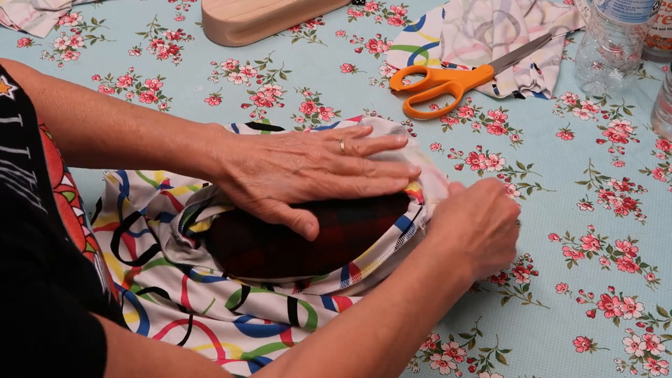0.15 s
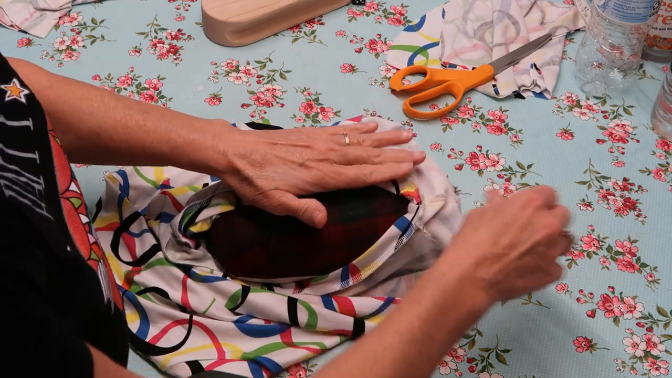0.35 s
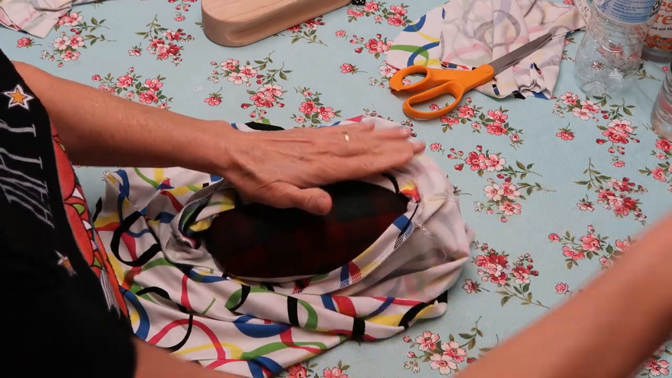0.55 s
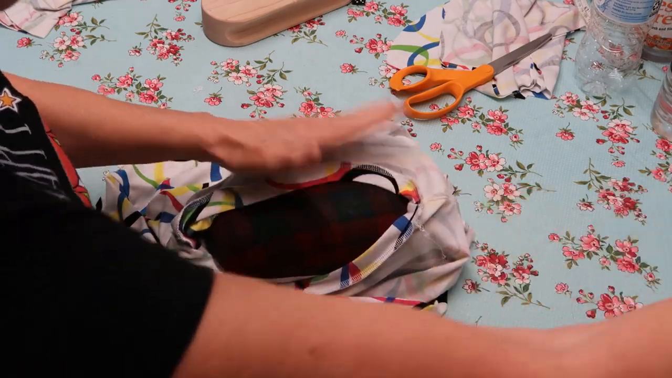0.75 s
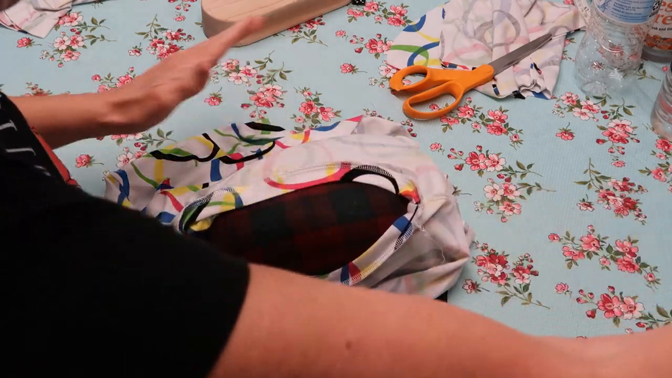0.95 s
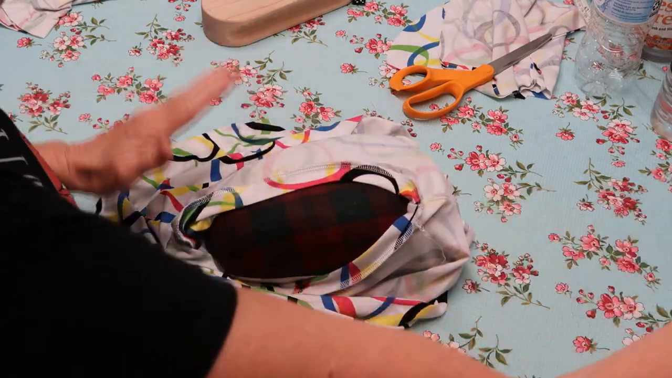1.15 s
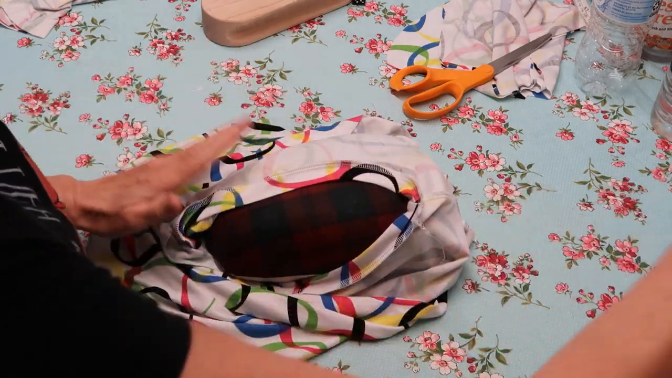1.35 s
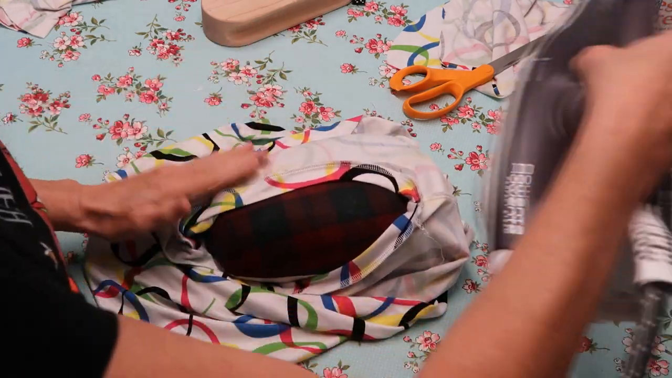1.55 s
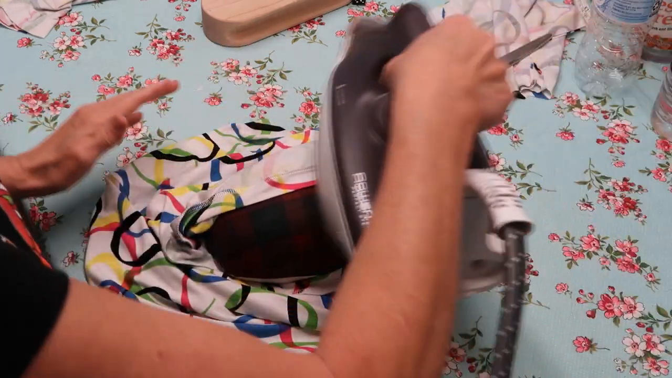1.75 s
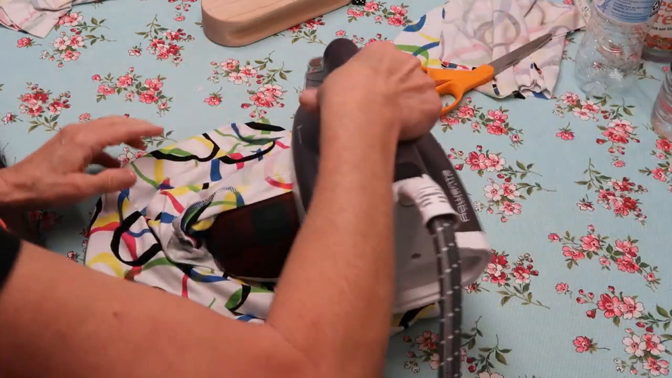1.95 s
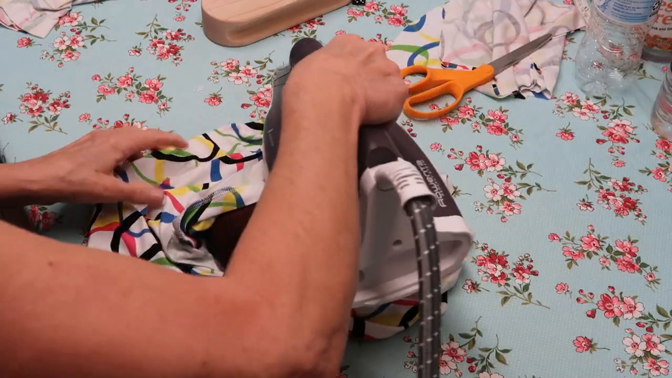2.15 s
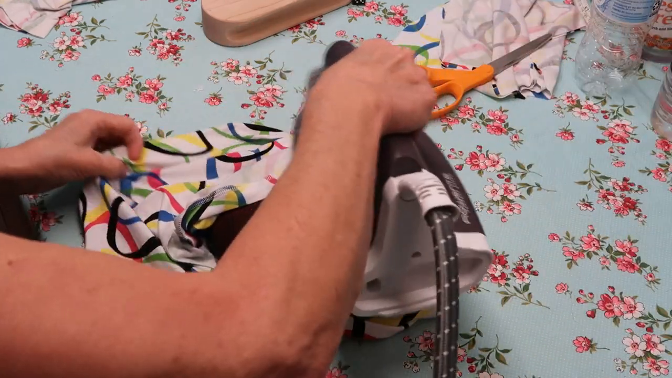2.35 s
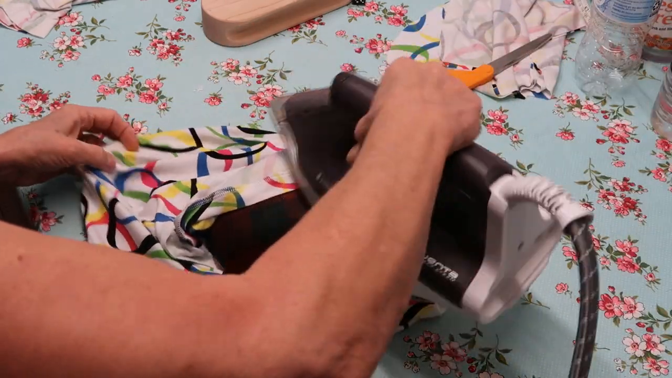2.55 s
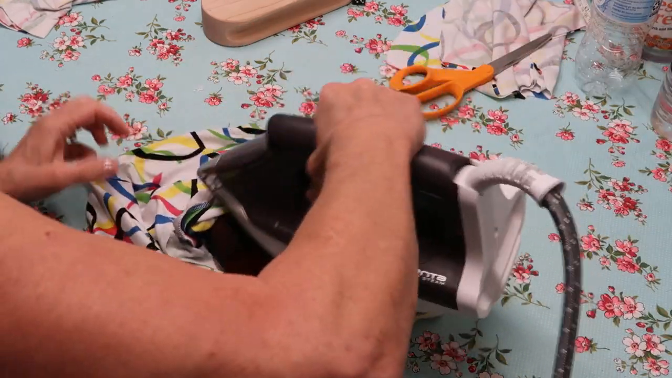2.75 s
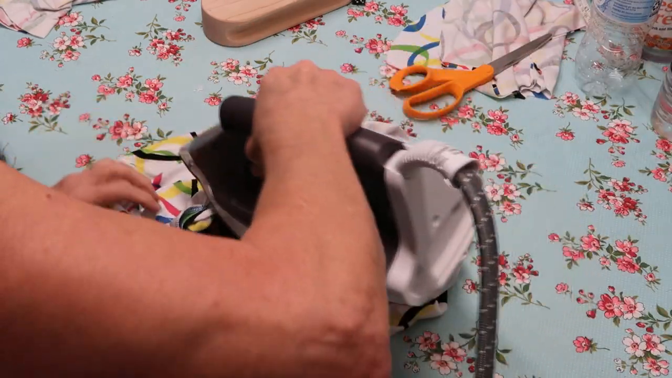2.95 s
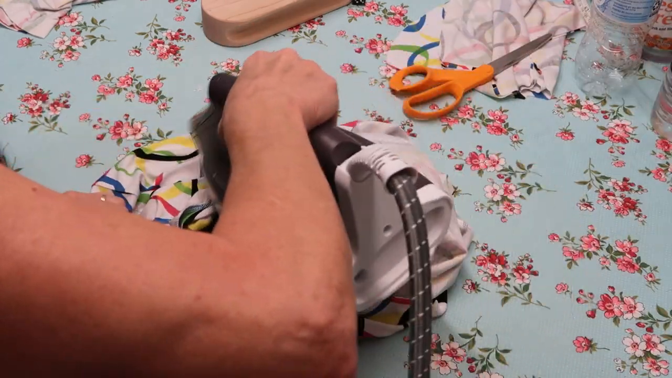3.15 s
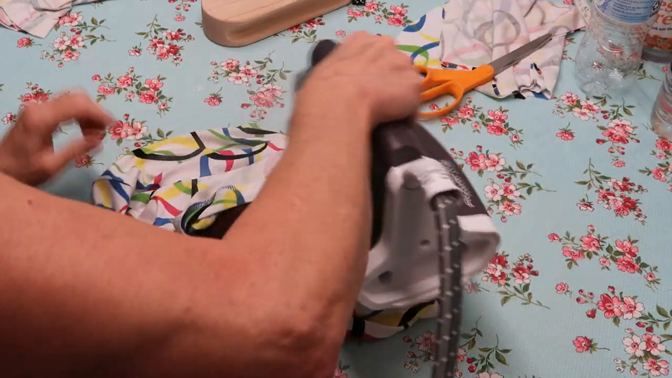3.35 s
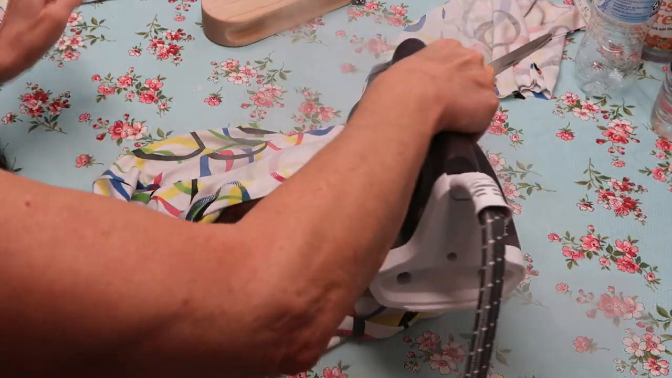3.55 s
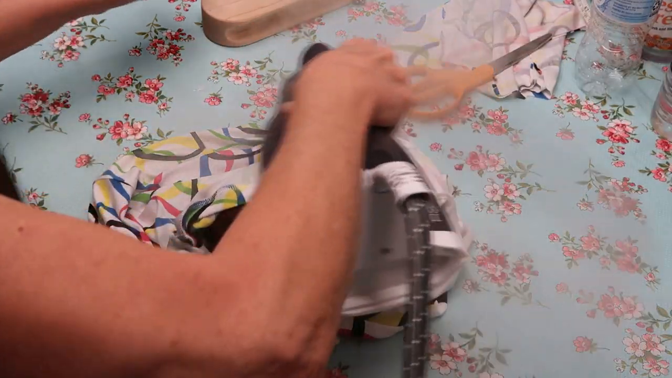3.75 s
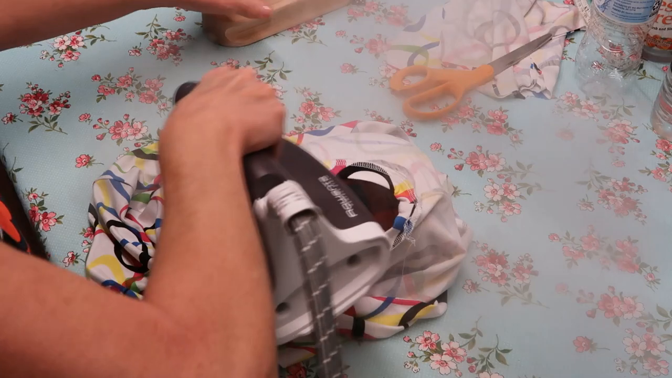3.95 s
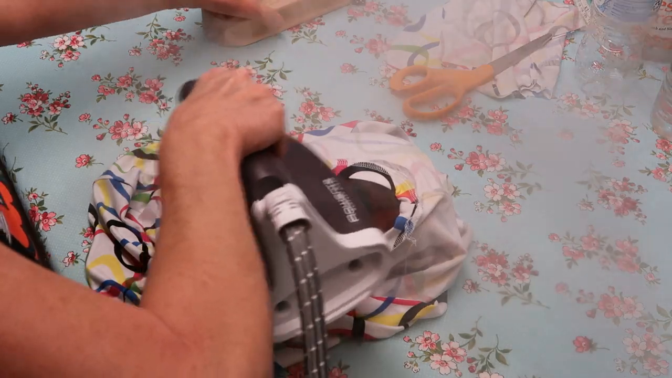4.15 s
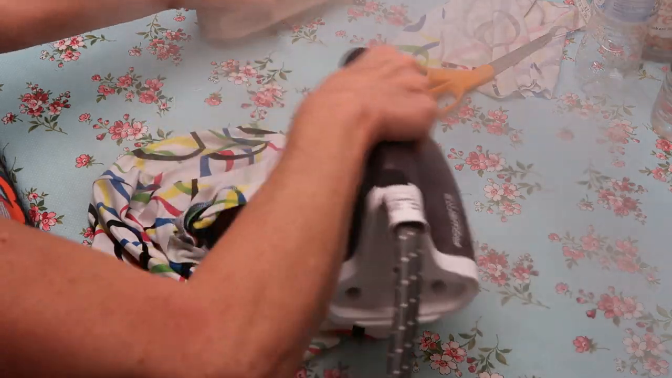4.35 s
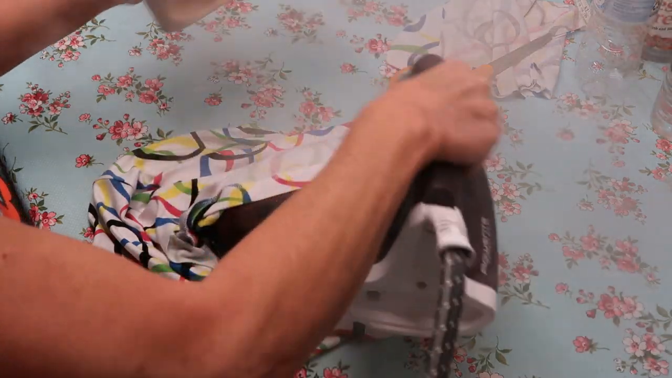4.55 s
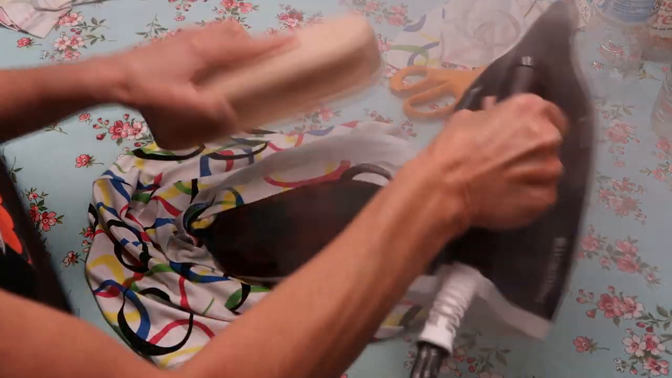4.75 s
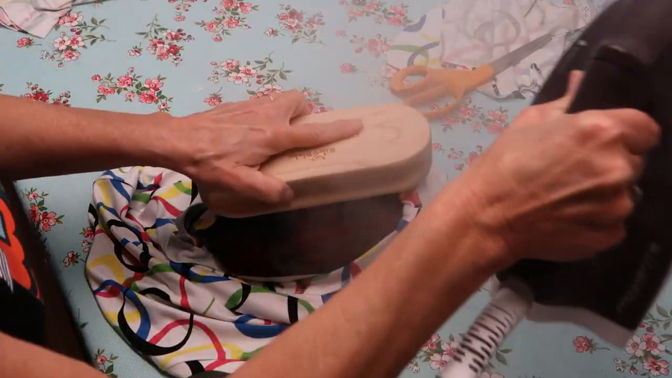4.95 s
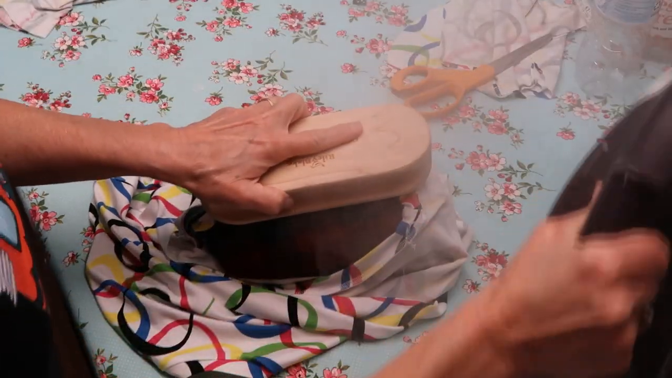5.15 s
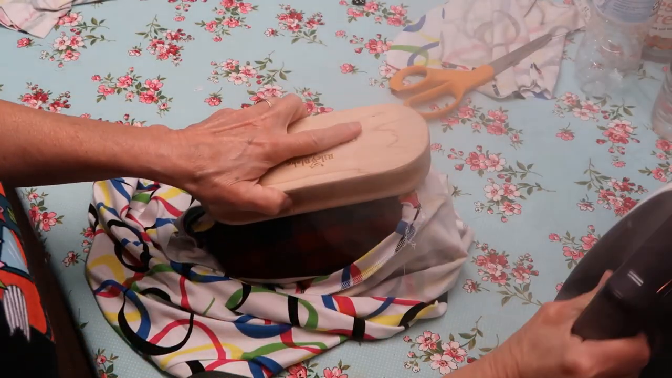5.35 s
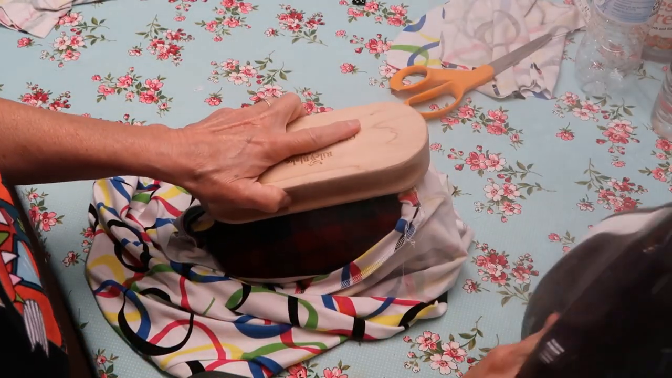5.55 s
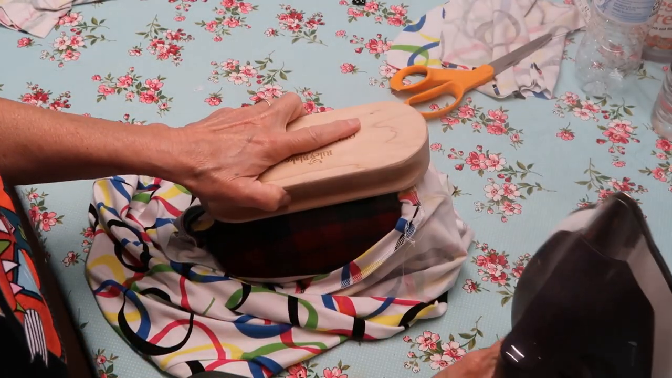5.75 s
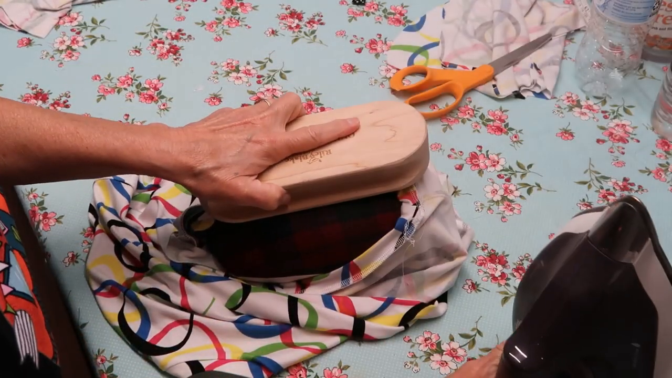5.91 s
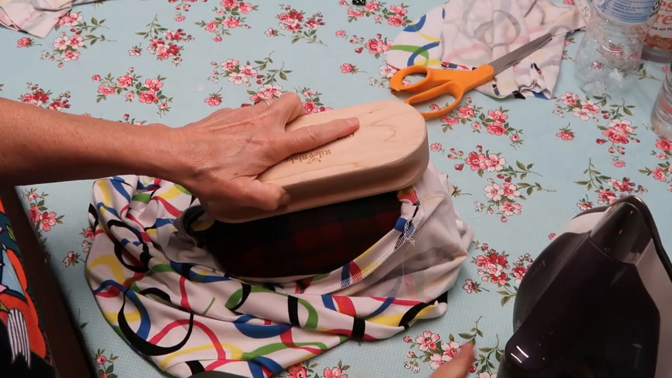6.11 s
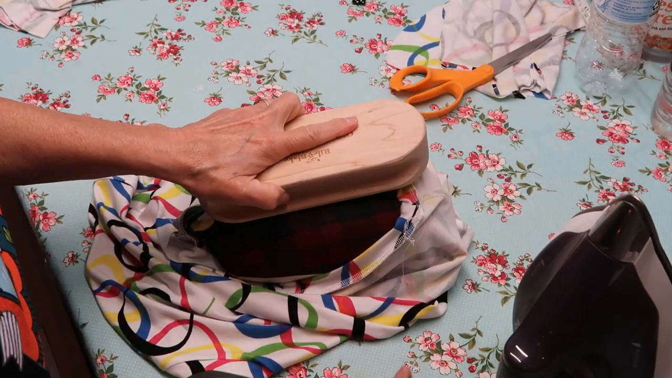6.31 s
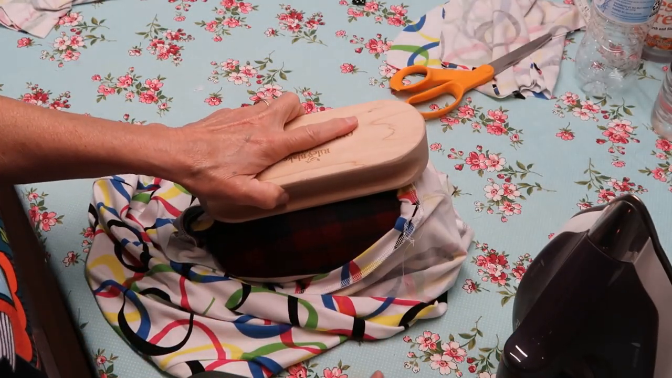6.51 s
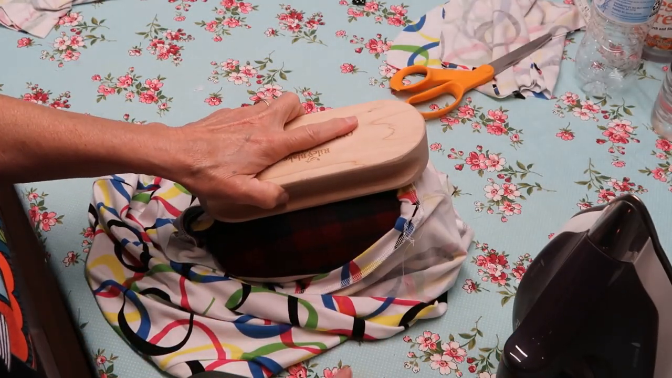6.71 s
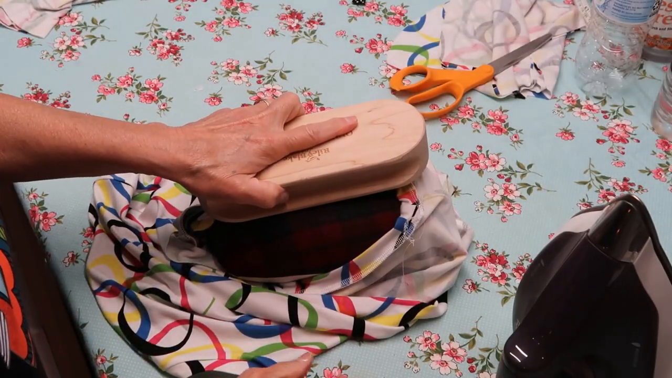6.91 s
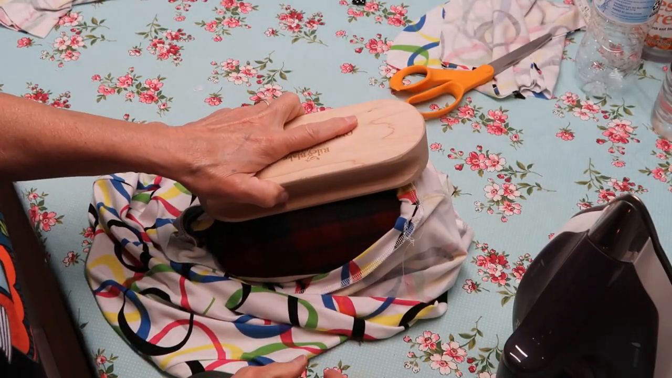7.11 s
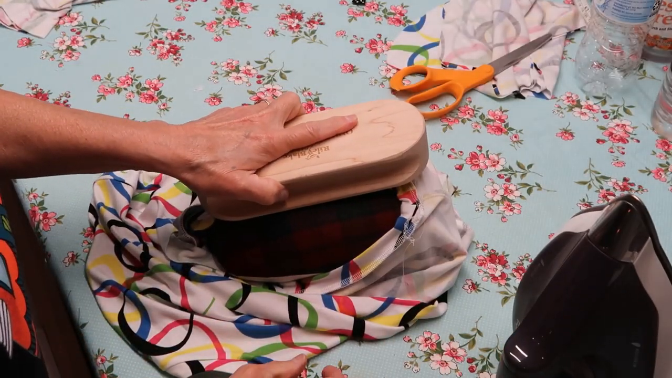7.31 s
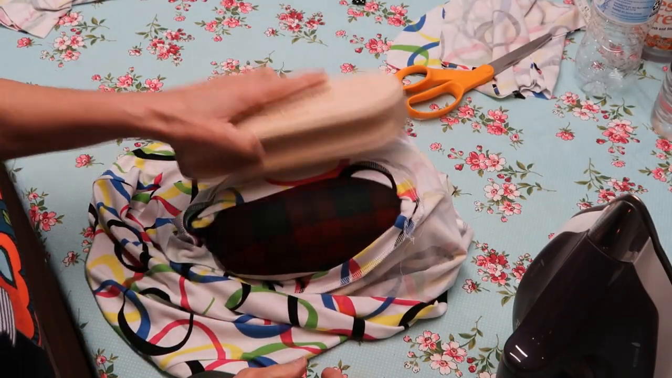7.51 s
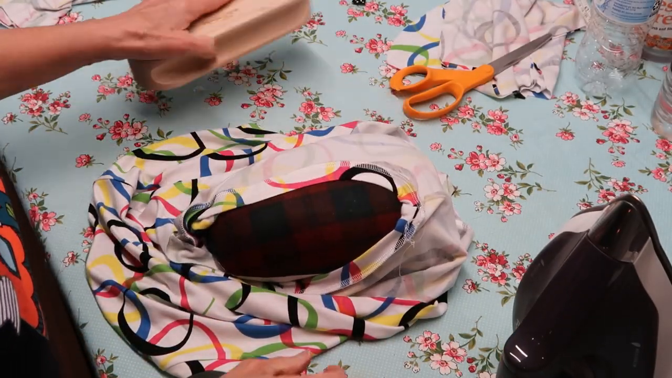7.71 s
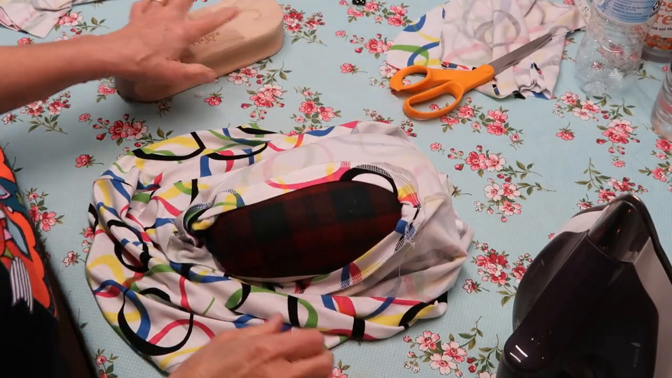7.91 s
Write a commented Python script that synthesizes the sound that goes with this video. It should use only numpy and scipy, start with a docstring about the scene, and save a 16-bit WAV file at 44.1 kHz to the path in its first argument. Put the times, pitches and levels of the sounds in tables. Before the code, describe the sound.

A quiet room is heard close up, with a faint low tremble from a padded table. For the first two seconds, hands make soft pats, light knocks and faint cloth rubs. At about 2.2 seconds a steam iron lands with a dull knock and small clicks, then rubs briefly over fabric. At 3 seconds its trigger clicks sharply and a loud burst of steam hisses until about 3.7. Another click at 3.9 starts a second, slightly duller burst, dying away by 4.7. Water then sizzles inside the iron with a slight whistle, strongest around 5.2 and faint until 7.5. A wooden block presses onto the cloth with soft thumps around 5 seconds, and the iron is set down with a low thump and small clicks near 5.6. At about 7.9 the block is put down with a dull knock.

```python
"""Soft thumps, knocks and rubs come first: hands, a steam iron and a wooden block on cloth over a padded table.
The trigger clicks and the iron blows two bursts of steam, turbulent noise coloured by the vents of its
sole plate; then water sizzles on in the resonant chamber. Blows excite damped modes of iron and table,
sliding friction hisses, and the padding groans when pushed. Behind it all lie a low tremble of the
table, a quiet room and the thin whine of camera electronics."""
import sys
import numpy as np
from scipy import signal
from scipy.io import wavfile
from scipy.ndimage import uniform_filter1d

SR = 44100
rng = np.random.default_rng(int(sys.argv[2]) if len(sys.argv) > 2 else 0)


def pcm_store(signal):
    """Save signal as 16-bit PCM."""
    levels = np.round(np.clip(np.atleast_2d(signal), -1, 1) * 32767)
    wavfile.write(sys.argv[1], SR, levels.astype(np.int16).T)


N = 355887

# soft blows on the table: t/s, peak level/dB, most excited f/Hz, rise/s
TABLE_BLOWS = [(0.254, -38, 53.4, 0.0048), (0.437, -31.5, 50, 0.0067), (0.666, -41, 61.9, 0.0092),
               (0.942, -41, 56.5, 0.015), (1.073, -35, 53.8, 0.02), (1.309, -28, 57, 0.0062),
               (1.543, -27, 100, 0.0035), (1.913, -31.5, 71.5, 0.0065), (2.139, -30, 97, 0.0052),
               (3.154, -23, 147, 0.0026), (4.921, -23, 92, 0.0076), (4.944, -22.5, 87.4, 0.011),
               (5.142, -28.5, 162, 0.0052), (5.427, -31.5, 94, 0.0037), (5.57, -18.5, 105, 0.0064),
               (7.742, -44, 55, 0.015), (7.852, -18, 99, 0.004), (7.929, -38, 114.2, 0.018)]


def steam_jets(mix):
    """Turbulence drives the vent resonances; pressure brightens the jet, cloth over the vents dulls it."""
    # valve openings: t/s, ramp/s, first level/dB, settling/s, steady level/dB, shutting t/s,
    # decay/(dB/s), end t/s, then at full pressure: treble/dB, roar/dB, f/Hz of the hollow under the plate
    bursts = [(3.016, 0.017, -17.5, 0.046, -27, 3.23, 197.5, 3.24, 0, -6.5, 2630),
              (3.162, 0.042, -8, .07, -13, 3.686, 93.5, 6, 3, -17.5, 2820),
              (3.908, 0.017, -17, 0.18, -10.5, 4.39, 115, 4.75, -8, -17.5, 2630)]
    # spectrum of the jet: f/Hz, density level/dB
    jet_spectrum = [(71, -50.5), (120, -26.5), (156, -26), (203, -23.5), (356, -8), (590, -2.5),
                    (693, -7.5), (1590, -6.5), (1720, -1.5), (1900, -11), (3080, -3), (3700, -7),
                    (6000, -4.5), (12900, -18.5), (14900, -43)]
    # steam channels of the sole plate: f/Hz, width/Hz, level/dB
    vents = [(1434, 17.098, 3), (1762, 28, -5), (1920, 59, -0.5), (2083, 43, 1.5), (2210, 43, -4),
             (2470, 19, 1), (2700, 38, -6.5), (3060, 42, -7), (3517, 73, -1), (3915, 60, 0),
             (4330, 21, 3.5), (4620, 27, -0.5), (4990, 23, -1), (6050, 76, -13.5), (7200, 80, -4)]
    ramp_db, knee_s, full_pressure_db = 23, 0.036, -12.5

    def colour(hz, treble_db, roar_db, hollow_hz):
        tilt_db = (treble_db + 8.5) * shelf(hz, 7600) + (roar_db + 13) * (1 - shelf(hz, 1300))
        hollow = resonances([(hollow_hz, 900, 6)], hz, valley_db=-0.24)
        return amp(curve(jet_spectrum, hz) + tilt_db) * resonances(vents, hz, valley_db=-8.5) * hollow
    for start, ramp, first_db, settle, steady_db, shut, decay, end, treble, roar, hollow_hz in bursts:
        t = np.arange(0, end - start, .004)
        open_s = np.maximum(t - ramp, 0)
        db = steady_db + (first_db - steady_db) * np.exp(-open_s / settle)
        db -= ramp_db * np.maximum(1 - t / ramp, 0)  # the valve opens
        db -= decay * knee_s * np.logaddexp(0, (t + start - shut) / knee_s)  # and shuts softly
        slack_db = np.maximum(full_pressure_db - db, 0)
        wet_db = 16.5 * np.exp(-open_s / .03)  # wet steam comes first, the treble follows
        controls = [treble - 2 * slack_db - wet_db, roar + 0.26 * slack_db, hollow_hz - 9 * slack_db]
        add(mix, start, close_noise(start + t, db, colour, controls, (1500, 6000), 2.5, 0.5))


def sizzle(mix):
    """Boiling excites the chamber's cavity resonances; harder boiling is brighter and whistles more."""
    # water boiling off inside the iron: t/s, level/dB, whistle f/Hz
    boiling = [(4.55, -52, 2300), (4.65, -45, 2320), (4.89, -37, 2405), (5.2, -34.5, 2240),
               (5.36, -40, 2040), (5.56, -46.5, 2030), (5.78, -57, 2100), (5.86, -50, 2210),
               (6.07, -57, 2140), (6.799, -56, 2200), (7.4, -57, 2190), (7.55, -74, 2170)]
    # chamber resonances: f/Hz, width/Hz, level/dB
    chamber = [(1091, 130, 6), (1450, 49, 0), (1690, 50, 6.5), (1920, 64, 2), (2703, 66, 4), (3010, 78, -1),
               (3620, 290, -5.5)]

    def colour(hz, centre_hz, whistle_hz, whistle_db):
        cavity = resonances(chamber + [(whistle_hz, 90, whistle_db)], hz, valley_db=-24.5)
        return cavity * amp(-1.8 * np.log2((hz + 1) / centre_hz) ** 2)
    times, db, whistle_hz = np.transpose(boiling)
    vigour_db = db + 35  # relative to a hard boil
    controls = [1850 + 33 * vigour_db, whistle_hz, 10 + 0.2 * vigour_db]
    add(mix, times[0], close_noise(times, db, colour, controls, (900, 4500), 3.5, 0.5))


def clicks(mix):
    """Impulse excitation: the iron's shell rings in its modes under a short crack of noise."""
    # trigger, valve and cord: t/s, level/dB, T60/s, relative crack/dB, most excited f/Hz
    snaps = [(2.0128, -41, 0.045, -19, 3110), (2.0482, -30.5, 0.072, -9.5, 2640),
             (2.1454, -18.5, 0.13, -17, 3570), (2.293, -24, 0.092, -11.5, 1490),
             (2.9146, -34.5, 0.06, -6.5, 2570), (3.0106, -4.5, 0.046, -19.5, 1290),
             (3.0135, -13, 0.07, -12, 4300), (3.9143, -15, 0.058, -16.5, 2460),
             (4.852, -33, 0.05, -16, 2520), (5.3449, -31, 0.087, -19, 1650),
             (5.7954, -29, 0.097, -4.5, 1540), (6.8508, -54, 0.041, -27, 3500),
             (7.4993, -43.5, 0.055, -7.5, 1740), (8.0531, -48.5, 0.066, -29, 1450)]
    # modes of the shell: f/Hz, level/dB, T60/s
    shell = [(850, -2.5, .04), (967, -4, 0.0521), (1420, -2, .24), (1980, -7, 0.059), (2617, -0.5, 0.3),
             (3194, -1, 0.03), (3580, 0, 0.046), (4380, 1.5, 0.081), (4930, -4.5, .04), (5750, -1, 0.04)]
    t = np.arange(round(.25 * SR)) / SR
    for start, db, t60, crack_db, centre_hz in snaps:
        white = rng.standard_normal((2, len(t)))
        hiss = bandpass(white[0] + 3.4 * white, (2500, 10000), order=2)
        crack = unit_rms(hiss) * amp(crack_db - 8 - 60 * t / (1.2 * t60))
        click = (struck_modes(shell, centre_hz, t, t60) + crack) * np.minimum(t / 0.00032, 1)
        add(mix, start, amp(db) * in_room(click))


def knocks(mix):
    """Two damped clusters of close modes beat into a dull knock under a dry crack."""
    # fingers, block and iron: t/s, level/dB, low f/Hz, high f/Hz, high share/dB, T60/s, relative crack/dB
    impacts = [(0.303, -26, 403, 1776, -4.5, 0.096, -24), (0.929, -43, 502, 1280, -1, 0.15, -27),
               (1.072, -18.5, 696, 1198, 4, 0.052, -17.5), (1.084, -31, 316, 1178, -14, 0.12, -32),
               (1.298, -28.5, 375, 802, -22, 0.032, -37), (1.531, -22.5, 377, 832, -13, 0.08, -26.5),
               (1.945, -33, 460, 824, -3, 0.073, -19), (2.152, -8.5, 494, 1750, -8.5, 0.031, -17.5),
               (2.219, -18, 374, 1440, -16, 0.028, -25), (2.367, -27, 366, 1290, -14, 0.059, -28),
               (3.011, -7, 363, 1446, -1.5, 0.046, -13.5), (3.914, -15, 639, 1430, -3, 0.018, -18),
               (4.924, -26.5, 391, 1110, -27, 0.07, -25), (5.159, -31, 328, 800, -10, 0.062, -30),
               (5.57, -30.5, 380, 1300, -10.5, 0.074, -15.5), (7.856, -21.5, 317, 1230, -12, 0.059, -27)]
    t = np.arange(round(.25 * SR)) / SR
    for start, db, low_hz, high_hz, high_db, t60, crack_db in impacts:
        detunings, phases = np.exp(0.1973 * rng.standard_normal((2, 12, 1))), rng.random((2, 12, 1))
        low, high = (np.sin(2 * np.pi * f * t) + 0.55 * np.sin(2 * np.pi * (f * k * t + p)).sum(axis=0)
                     for f, k, p in zip((low_hz, high_hz), detunings, phases))
        low_gain = np.sqrt(np.clip(1 - amp(high_db) ** 2, .03, 1))
        body = low * low_gain * amp(-60 * t / t60) + high * amp(high_db - 60 * t / (0.71 * t60))
        hiss = bandpass(rng.standard_normal(len(t)), (1800, 4000), order=3)
        crack = unit_rms(hiss) * amp(crack_db - 2 - 60 * t / (1.1 * t60))
        knock = (body / abs(body).max() + crack) * np.minimum(t / 0.000764, 1)
        add(mix, start, amp(db) * in_room(np.array([knock, knock])))


def thumps(mix):
    """A cushioned impact swells gradually into the low modes of the table."""
    # modes of the table: f/Hz, level/dB, T60/s
    table_modes = [(65, 3, 0.19), (98.1, 2.5, .25), (131.9, -0.5, 0.14), (150.6, -3, 0.22), (221, -9, 0.19),
                   (307, -8, 0.12)]
    t = np.arange(round(.5 * SR)) / SR
    for start, db, centre_hz, rise in TABLE_BLOWS:
        thump = struck_modes(table_modes, centre_hz, t) * (1 - np.exp(-(t / rise) ** 2))
        add(mix, start, amp(db) * thump / abs(thump).max())


def cloth_rubs(mix):
    """Stick-slip friction of fibres makes grainy noise, which loses treble as the stroke weakens."""
    # strokes: loudest t/s, rise/s, hold/s, fall/s, level/dB, treble/dB, f/Hz of the sliding body
    strokes = [(.798, 0.052, 0.022, 0.13, -53.5, 9, 2320), (.938, 0.092, 0.073, .03, -55, -23, 1350),
               (1.04, 0.063, .005, 0.027, -45.5, -16, 1410), (1.476, 0.037, 0.053, .01, -44, 0, 2660),
               (2.05, .015, .005, 0.041, -37.5, -0.5, 2450), (2.152, .01, 0.19, 0.079, -24, -11.5, 1450),
               (2.39, .08, 0.0075, 0.081, -30.5, -24, 1470), (2.568, 0.062, .07, 0.09, -41.5, 1, 3950),
               (2.752, 0.037, .01, 0.065, -53.5, 5, 1950), (5.573, 0.026, 0.0055, 0.053, -37, -25, 1320),
               (7.838, 0.1, .01, 0.022, -54, -2, 1500), (7.86, .02, 0.0043, 0.038, -35, -25, 1340)]
    # friction spectrum of cloth: f/Hz, density level/dB
    cloth = [(180, -31.5), (300, 6), (421, -14), (639, -8), (726, -7.5), (1020, -4), (1250, -11.5),
             (1450, -11), (1940, -9.5), (3240, -16), (3930, -16.5), (9990, -32.5), (11000, -56),
             (12300, -24), (14000, -44)]

    def colour(hz, treble_db, ring_hz):
        friction = amp(curve(cloth, hz) + (treble_db + 13) * shelf(hz, 2170))
        return friction * resonances([(ring_hz, 80, 12)], hz, valley_db=0.5)
    for top, rise, hold, fall, db, treble_db, ring_hz in strokes:
        times, levels = swell(top, rise, hold, fall, db)
        controls = [treble_db + (levels - db) * (times > top), np.full(4, ring_hz)]
        add(mix, times[0], close_noise(times, levels, colour, controls, (450, 10000), .8, 1.4))


def padding_groans(mix):
    """Pushed padding groans: noise through one low resonance."""
    # pushes: loudest t/s, rise/s, hold/s, fall/s, level/dB, f/Hz
    pushes = [(.96, 0.039, 0.091, 0.093, -46, 190), (1.084, 0.028, .005, .1, -51, 260),
              (1.552, 0.0098, .005, 0.079, -44, 163), (2.165, .02, .01, .08, -30.5, 256),
              (2.218, 0.039, .01, 0.15, -26.5, 267), (2.38, 0.086, .01, 0.089, -34, 340),
              (2.574, 0.031, 0.037, .11, -31, 223), (3.022, 0.012, 0.0055, 0.025, -22, 252),
              (3.164, .12, 0.053, .05, -33, 295), (4.72, 0.23, .02, 0.3, -39.5, 228),
              (4.91, 0.023, .005, 0.17, -38.5, 248), (5.09, .15, 0.0046, 0.054, -37.5, 239),
              (5.154, 0.035, .02, 0.19, -32.5, 172), (5.426, .15, 0.009, .16, -41.5, 175),
              (5.6, .02, 0.0082, 0.13, -31, 158), (5.788, 0.064, .005, .09, -46.5, 236),
              (7.87, 0.0097, .005, 0.12, -29, 164)]

    def colour(hz, pitch_hz):
        return 1 / (1 + ((hz - pitch_hz) / 45) ** 2)
    for *movement, pitch_hz in pushes:
        times, levels = swell(*movement)
        add(mix, times[0], close_noise(times, levels, colour, [np.full(4, pitch_hz)], (140, 450), 1, 1.5))


def table_tremble():
    """Vibration forced by busy hands and the free decay after each blow add in power."""
    # trembling under the hands: t/s, level/dB
    handling = [(0.0, -54), (.3, -53), (2.05, -49), (2.29, -41), (2.63, -48.5), (3.19, -52), (3.3, -37.5),
                (4.07, -73), (4.67, -68), (4.8, -60), (5.85, -54), (6.0, -62), (7.3, -59.5), (7.8, -56.5),
                (8.07, -44)]
    # spectrum of the tremble: f/Hz, density level/dB
    rumble_spectrum = [(12, -35), (20, 0.5), (70, 3), (124, -3), (200, -14), (260, -46.5), (440, -120)]
    wake_db, wake_t60 = -21.5, .6
    t = np.arange(N) / SR
    rumble = shaped_noise((0, N / SR), lambda s, hz: amp(curve(rumble_spectrum, hz)), diffuse, 3, 1.5, 2048)
    wake_power = sum((t > start) * amp(db + wake_db - 60 * abs(t - start) / wake_t60) ** 2
                     for start, db, *_ in TABLE_BLOWS)
    hand_power = amp(np.interp(t, *np.transpose(handling))) ** 2
    return np.sqrt(hand_power + wake_power) * unit_rms(rumble)


def room_tone():
    """A diffuse field of faint noise, strongest in the bass."""
    # spectrum of the room: f/Hz, density level/dB
    air_spectrum = [(53, -32.5), (90, -9), (258, -5), (603, -13.5), (773, -12.5), (1350, -17.5),
                    (2620, -19), (10000, -34.5), (11800, -38.5), (12600, -50), (16400, -71.5),
                    (22000, -120)]
    air = shaped_noise((0, N / SR), lambda s, hz: amp(curve(air_spectrum, hz)), diffuse, 2, 0.9)
    return amp(-53.5) * unit_rms(air)


def electronics_whine():
    """An amplitude-modulated tone, stronger on the left and in antiphase on the right."""
    whine_hz, pulse_hz = 13008, 29.97
    t = np.arange(N) / SR
    pulsing = 1 + 0.84 * np.cos(2 * np.pi * (pulse_hz * t + .87))
    return amp(-76) * np.array([[2.2], [-.5]]) * np.sin(2 * np.pi * whine_hz * t) * pulsing


def swell(top, rise, hold, fall, db):
    """Envelope of a movement as four times and levels: it rises, sags while held, and falls."""
    depth_db, sag_db_per_s = 19.5, 41
    sagged_db = db - sag_db_per_s * hold
    times = top + np.array([-rise, 0, hold, hold + fall])
    return times, np.array([db - depth_db, db, sagged_db, sagged_db - depth_db])


def struck_modes(modes, centre_hz, t, longest_t60=1):
    """Superposition of damped modes, those near centre_hz excited most; peak 1."""
    ring = sum(amp(db - 8.6 * np.log2(f / centre_hz) ** 2 - 60 * t / min(t60, longest_t60))
               * np.sin(2 * np.pi * f * t) for f, db, t60 in modes)
    return ring / abs(ring).max()


def close_noise(times, db, colour, controls, band_hz, patchy_db, flicker_db):
    """Source and filter: noise of gain colour(hz, *controls) whose level within band_hz follows db."""
    def shape(t, hz):
        gain = colour(hz, *(np.interp(t, times, control) for control in controls))
        inside = (hz > band_hz[0]) & (hz < band_hz[1])
        return gain / np.sqrt((inside * gain ** 2).sum(axis=0) * 8 / 3)
    noise = shaped_noise((times[0], times[-1]), shape, near, patchy_db, flicker_db)
    t = np.arange(noise.shape[1]) / SR
    edge_fade = np.minimum(np.minimum(t, t[::-1]) / 0.0016, 1)
    return noise * amp(np.interp(times[0] + t, times, db)) * edge_fade


def shaped_noise(span, shape, coherence, patchy_db, flicker_db, size=1024):
    """Partly coherent stereo noise of gain shape(s, hz), with drifting patches and a broadband flicker."""
    count, hop = round(span[1] * SR) - round(span[0] * SR), size // 4
    times = span[0] + np.arange(count // hop + 5) * hop / SR
    hz = np.fft.rfftfreq(size, 1 / SR)[:, None]
    left_re, left_im, other_re, other_im, patches = rng.standard_normal((len(times), len(hz), 5)).T
    patches = unit_rms(uniform_filter1d(uniform_filter1d(patches, size=3, axis=0), size=24, axis=1))
    flicker = unit_rms(uniform_filter1d(rng.standard_normal(len(times)), size=3))
    shared, left = coherence(hz), left_re + 1j * left_im
    right = shared * left + np.sqrt(1 - shared ** 2) * (other_re + 1j * other_im)
    gain = shape(times, hz) * amp(patchy_db * patches + flicker_db * flicker)
    return signal.istft(np.array([left, right]) * gain, nperseg=size, noverlap=size - hop)[1][:, :count]


def near(hz):
    """A close source reaches both microphone ports in phase in the bass, in antiphase in the top treble."""
    # direct sound: f/Hz, left-right correlation
    direct_correlation = [(60, 0.9), (99, 1), (160, 1), (270, 1), (440, 1), (720, 1), (1190, 1.0),
                          (1960, 1.0), (3230, 0.94), (5320, 0.51), (8750, -0.24), (14400, -0.97)]
    return np.clip(curve(direct_correlation, hz), -1, 1)


def diffuse(hz):
    """Sound from all sides is coherent at the two ports only at long wavelengths."""
    # room sound: f/Hz, left-right correlation
    room_correlation = [(60, 1), (150, 0.94), (370, 0.44), (930, 0.27), (2320, -0.0071), (5780, 0.073),
                        (14400, -0.26)]
    return np.clip(curve(room_correlation, hz), -1, 1)


def in_room(dry, t60=0.4):
    """Reverberation: an exponentially decaying tail, partly different at the two ports."""
    t = np.arange(dry.shape[-1]) / SR
    tail = rng.standard_normal((2, len(t))) * amp(-41 - 60 * t / t60) * (t > .003)
    return dry + signal.fftconvolve(dry, tail[:1] + 0.17 * tail, axes=1)[:, :len(t)]


def resonances(peaks, hz, valley_db):
    """Gain of resonance curves added in power over a flat valley."""
    power = sum(amp(db) ** 2 / (1 + (2 * (hz - f) / width) ** 2) for f, width, db in peaks)
    return np.sqrt(amp(valley_db) ** 2 + power)


def curve(points, hz):
    """Interpolation on a logarithmic frequency axis."""
    f, value = np.transpose(points)
    return np.interp(np.log(hz + 1), np.log(f + 1), value)


def shelf(hz, edge_hz):
    """Smooth transition from 0 to 1 around edge_hz."""
    return 1 / (1 + (edge_hz / (hz + 1)) ** 4)


def bandpass(x, band_hz, order):
    """Maximally flat band filter."""
    return signal.sosfilt(signal.butter(order, band_hz, "bandpass", fs=SR, output="sos"), x)


def amp(db):
    """Amplitude ratio of a level."""
    return 10 ** (np.asarray(db) / 20)


def unit_rms(x):
    """Normalisation to unit power."""
    return x / np.sqrt(np.mean(x ** 2) + 1e-20)


def add(mix, start, sound):
    """Superposes a sound from time start on."""
    part = mix[..., round(start * SR):][..., :sound.shape[-1]]
    part += sound[..., :part.shape[-1]]


def scene():
    """Linear superposition of all sources at the two microphone ports."""
    mix = room_tone() + table_tremble() + electronics_whine()
    for source in (sizzle, steam_jets, cloth_rubs, padding_groans, clicks, knocks, thumps):
        source(mix)
    return mix


def record(dry):
    """The microphone is band-limited, and a suppressor turns the bass down under loud sound."""
    threshold_db, top_hz = -30.5, 15000
    picked = signal.sosfilt(signal.butter(2, 38, "highpass", fs=SR, output="sos"), dry)
    power = uniform_filter1d((picked ** 2).mean(0), size=17000, origin=6000)
    excess_db = np.maximum(10 * np.log10(abs(power) + 1e-12) - threshold_db, 0)
    bass = signal.sosfiltfilt(signal.butter(2, 130, fs=SR, output="sos"), picked)
    suppressed = picked - bass * (1 - amp(-.9 * excess_db))
    lowpass = signal.firwin(511, top_hz, window=("kaiser", 9), fs=SR)
    return signal.oaconvolve(suppressed, lowpass[None], "same")


dry = scene()
out = record(dry)
pcm_store(out)
```